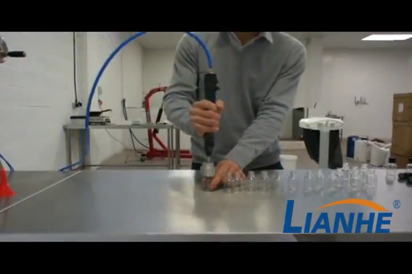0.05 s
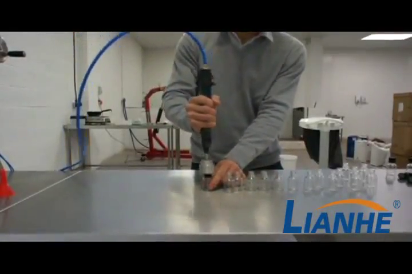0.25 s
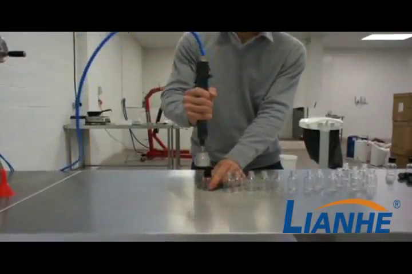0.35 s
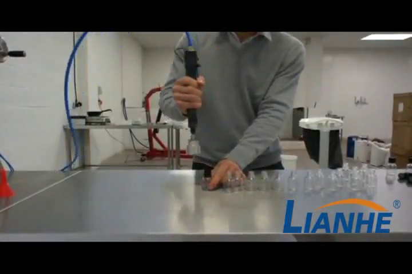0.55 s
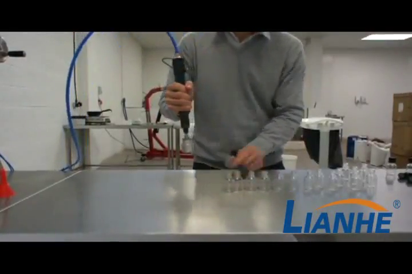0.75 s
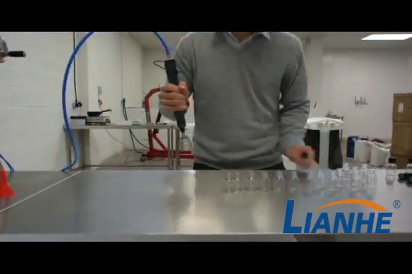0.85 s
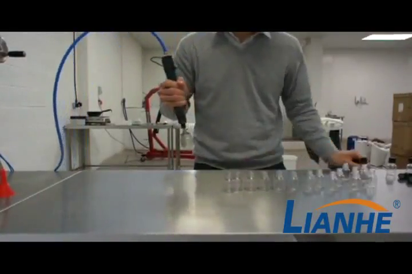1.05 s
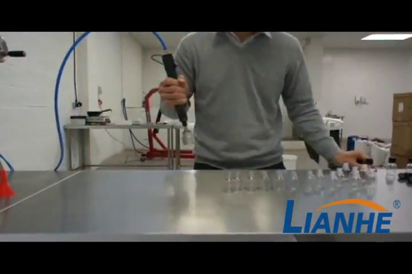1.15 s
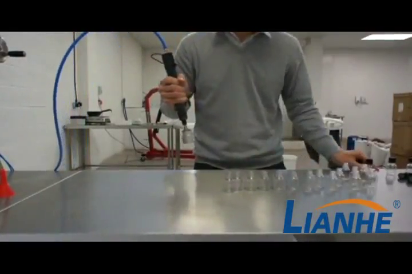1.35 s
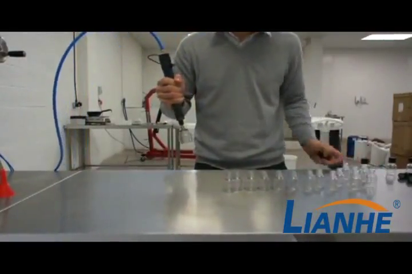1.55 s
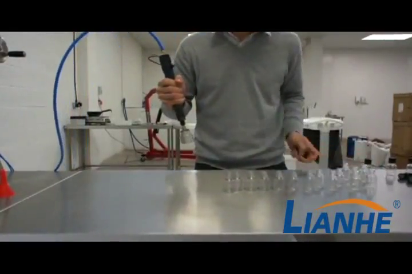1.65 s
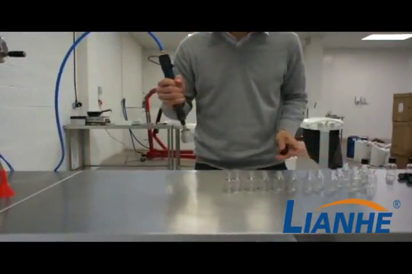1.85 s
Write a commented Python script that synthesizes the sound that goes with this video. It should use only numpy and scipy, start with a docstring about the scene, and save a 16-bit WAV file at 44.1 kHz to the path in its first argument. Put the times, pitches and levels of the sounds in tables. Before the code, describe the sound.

A handheld pneumatic capping tool gives one short burst of spitting air and shrill whine, clicks and pops off, rings through a hard workshop, then small glassy bottles knock lightly on a steel table.

```python
"""A large hard workshop: under a background murmur whose level rises, a handheld air motor screws a cap onto
a bottle. Spitting exhaust hiss and a valve thump open it, then comes a vane whine that sags under load, with a
clutch tick and a popping release. The hall rings on as filtered noise; then bottles, built from decaying
sine modes, knock on a steel table. A low hum swells near the end."""
import sys
import numpy as np
from scipy import signal
from scipy.fft import rfft, irfft
from scipy.io import wavfile
from scipy.ndimage import uniform_filter1d

SR = 44100
rng = np.random.default_rng(int(sys.argv[2]) if len(sys.argv) > 2 else 0)


def gain_from_db(level_db):
    """Convert decibel levels to linear amplitude factors (20 dB per decade)."""
    decades = np.asarray(level_db, float) / 20
    return 10 ** decades


def master_out(mix):
    """Clip the mix to full scale and print it as 16-bit PCM to the path in sys.argv[1]."""
    frames = np.transpose(np.atleast_2d(mix))
    ceiling = np.clip(frames, -1, 1)
    pcm = np.round(ceiling * 32767).astype(np.int16)
    wavfile.write(sys.argv[1], SR, pcm)


N = 83790
T = np.arange(N) / SR


def evened(x):
    """Scales a signal to an rms of one."""
    return x / np.sqrt(np.mean(x ** 2) + 1e-20)


def read(points, hz):
    """Reads a (Hz, value) table along a logarithmic frequency axis."""
    f, value = np.transpose(points)
    return np.interp(np.log(hz + 1), np.log(f + 1), value)


def curve(rows, axis):
    """A column in dB along time as gain, practically silent (-120 dB) outside."""
    rows = np.array(rows)
    return gain_from_db(np.interp(T, rows[:, 0], rows[:, axis], -120, -120))


def colour(x, points):
    """Shapes a spectrum by a (Hz, dB) table."""
    gain = gain_from_db(read(points, np.fft.rfftfreq(N, 1 / SR)))
    return irfft(rfft(x) * gain, N)


def slow(size):
    """Random wander of rms one: noise smoothed twice over size samples."""
    once = uniform_filter1d(rng.standard_normal(N), size)
    return evened(uniform_filter1d(once, size))


def add(mix, s, sound):
    """Lays a sound into the mix at s seconds, cut at the end."""
    part = mix[round(s * SR):][:len(sound)]
    part += sound[:len(part)]


def ring(modes, touch_s):
    """Struck solid: decaying sine modes of alternating sign; a longer touch softens the onset."""
    t = np.arange(6000) / SR
    onset = 1 - np.exp(-(t / touch_s) ** 2)
    body = sum((-1) ** k * gain_from_db(db - 60 * t / t60) * np.sin(2 * np.pi * hz * t)
               for k, (hz, db, t60) in enumerate(modes))
    return onset * body


def diffuse(gain):
    """Two partly alike noise channels with magnitude gain(Hz, s)."""
    # Each row: frequency in Hz, likeness of the two channels from -1 (opposite) to 1 (the same).
    likeness = [(60, 1), (150, 0.82), (500, 0.64), (1000, 0.44), (2000, 1), (3500, -0.74), (7000, -0.42),
                (13000, 0.35)]
    hz, t = np.fft.rfftfreq(512, 1 / SR)[:, None], np.arange(N // 128 + 5) * 128 / SR
    a, b, c, d = rng.standard_normal((len(t), len(hz), 4)).T
    same = np.clip(read(likeness, hz), -1, 1)
    left = a + 1j * b
    right = same * left + np.sqrt(1 - same ** 2) * (c + 1j * d)
    spectra = np.array([left, right]) * gain(hz, t)
    return signal.istft(spectra, nperseg=512, noverlap=384)[1][:, :N]


def workshop():
    """Background murmur as coloured stereo noise, its level rising, and a late, wavering low sine hum."""
    # Colour of the background noise. Each row: frequency in Hz, relative level in dB.
    floor_colour = [(25, -38), (60, 0), (144, 1), (267, 3.5), (363, 1.5), (674, 3.5), (800, -2.5),
                    (1190, -0.5), (1570, -4), (5000, -11.5), (11000, -20.5), (12500, -31), (14000, -39)]
    # Background noise level. Each row: time in seconds, level in dB.
    floor_level = [(0, -65.5), (.08, -59.5), (.2, -58.5), (1, -52.5), (1.9, -45.5)]
    # Swell of the hum. Each row: time in seconds, peak level in dB.
    hum_swell = [(1.65, -89), (1.75, -61), (1.85, -48), (1.9, -64)]
    noise = evened(diffuse(lambda hz, t: gain_from_db(read(floor_colour, hz)) + 0 * t))
    hum_hz = 178 * (1 + 0.0254 * slow(size=2000))
    hum = np.sin(2 * np.pi * np.cumsum(hum_hz) / SR)
    return noise * curve(floor_level, axis=1) + curve(hum_swell, axis=1) * hum


def air():
    """Turbulent exhaust as spitting hiss, and the dull rattle of the chuck on the cap; both are shaped noise."""
    # Each row: time in seconds, hiss level in dB, chuck rattle level in dB.
    air_levels = [(.205, -53, -81), (.21, -60, -54), (.219, -26.5, -40.5), (.255, -23, -29.5),
                  (.287, -25, -32), (.301, -19.5, -23.5), (.327, -32.5, -26.5), (.4, -23.5, -37),
                  (.465, -24.5, -36), (.499, -28, -28.5), (.53, -44, -33.5)]
    # Colour of the exhaust. Each row: frequency in Hz, relative level in dB.
    hiss_colour = [(1500, -13), (2500, -6.5), (4500, -8.5), (6500, -3), (7500, -5.5), (10000, -1),
                   (11500, -4.5), (12800, -17), (13600, -56), (15500, -33)]
    # Colour of the chuck on the cap. Each row: frequency in Hz, relative level in dB.
    rattle_colour = [(53, -68), (90, -11), (216, -5), (357, -3.5), (395, -7), (761, -2), (1120, 0.5),
                     (3230, -10.5), (5000, -12.5), (6500, -80), (11000, -120)]
    spits_db = 2  # rms level flutter
    hiss = evened(colour(rng.standard_normal(N), hiss_colour))
    hiss = hiss * gain_from_db(spits_db * slow(size=40))
    rattle = evened(colour(rng.standard_normal(N), rattle_colour))
    rattle = rattle * gain_from_db(spits_db * slow(size=100))
    return curve(air_levels, axis=1) * hiss + curve(air_levels, axis=2) * rattle


def valve():
    """Puffs as the valve opens and the air is dumped are short sine glides; metal ticks in the tool ring."""
    # Each row: start in seconds, peak level in dB, start pitch in Hz, end pitch in Hz, length in seconds.
    puffs = [(0.221, -22, 470, 390, 0.0079), (0.231, -24, 400, 354, 0.016), (.482, -29, 1665, 878, 0.0147),
             (.486, -18, 672, 488, 0.011), (0.503, -17, 598, 436, 0.0066), (0.511, -27.5, 540, 700, 0.0078),
             (0.541, -21.5, 683, 756, 0.0066)]
    # Metal ticks. Each row: start in seconds, level in dB (halved in amplitude below).
    ticks = [(0.2107, -37.5), (0.2829, -5), (0.296, -14), (0.313, -37)]
    # Modes of the ticking metal. Each row: frequency in Hz, relative level in dB, t60 in seconds.
    tick_modes = [(10920, 13, 0.0044), (6540, 5, .004), (3700, 5.5, .004), (9200, -16, .004),
                  (12260, -18, 0.002), (14600, -28, 0.0028)]
    out = np.zeros(N)
    for s, db, hz, end_hz, length in puffs:
        t = np.arange(0, length, 1 / SR)
        swell = np.sin(np.pi * t / length) ** 2
        glide = np.sin(np.pi * t * (2 * hz + (end_hz - hz) * t / length))
        add(out, s, gain_from_db(db) * swell * glide)
    for s, db in ticks:
        add(out, s, gain_from_db(db) * ring(tick_modes, touch_s=0.00018) / 2)
    return out


def whine():
    """Harmonics of the vane rate, loud where they cross the exhaust port's resonances."""
    # Each row: time in seconds, vane rate in Hz, whine level in dB.
    motor = [(.226, 1016, -33), (.236, 1073, -24), (.246, 1118, -19.5), (.258, 1144, -26), (.28, 1104, -19),
             (.308, 1074, -22), (.328, 1030, -19.5), (.345, 988, -30), (.364, 976.5, -20.5),
             (.408, 965, -33), (.44, 963, -21), (.468, 984.5, -19), (.49, 985, -29)]
    # Exhaust port colour for the vane harmonics. Each row: frequency in Hz, gain in dB.
    port = [(900, -30), (1090, -19), (1900, -30), (2900, -18), (3400, -28), (4850, -17), (5300, -10),
            (5650, -6), (5900, -11), (6300, -9), (6750, -3), (7200, -11), (7700, -27), (9000, -27),
            (9900, -14), (10700, -19), (12500, -32)]
    wobble, flutter_db = .0012, 1.3  # rms pitch wander as a fraction, rms level wander of each harmonic
    spin_s, stop_s = .006, .014
    rows = np.array(motor)
    hz = np.interp(T, rows[:, 0], rows[:, 1]) * (1 + wobble * slow(size=60))
    turns = np.cumsum(hz) / SR
    tone = np.zeros(N)
    for k in range(1, 12):
        level = gain_from_db(read(port, k * hz) + flutter_db * slow(size=150))
        tone += level * np.cos(2 * np.pi * (k * turns + rng.random()))
    spin_up = np.clip((T - rows[0, 0]) / spin_s, 0, 1)
    stop = np.clip((rows[-1, 0] - T) / stop_s, 0, 1)
    return np.sqrt(2) * spin_up * stop * curve(motor, axis=2) * tone


def hall(x, near_db):
    """Room response: direct sound, two clear echoes, dense scatter off benches and near walls, a long tail."""
    # Hall decay. Each row: frequency in Hz, t60 in seconds.
    decay = [(100, 1.64), (260, 1.05), (700, 1.17), (1840, 1.74), (4850, 1.7), (8000, 1.124), (12800, 0.6)]
    # Clear echoes. Each row: delay in seconds, left level in dB, right level in dB.
    echoes = [(.0105, -8, -10), (.0235, -13, -12)]
    hall_db, gap_s, build_s = -8, 0.016, 0.013
    near_t60_s, near_build_s = 0.25, 0.0088
    tail = diffuse(lambda hz, t: gain_from_db(-60 * t / read(decay, hz)))
    tail = tail * np.clip((T - gap_s) / build_s, 0, 1)
    near = diffuse(lambda hz, t: 1 + 0 * hz * t)
    near = near * gain_from_db(-60 * T / near_t60_s) * np.clip(T / near_build_s, 0, 1)
    # Levels are energies of the left channel against the direct sound.
    taps = gain_from_db(hall_db) * tail / np.linalg.norm(tail[0]) + gain_from_db(near_db) * near / np.linalg.norm(near[0])
    taps[:, 0] += 1  # direct sound
    for s, left_db, right_db in echoes:
        taps[:, round(s * SR)] += gain_from_db(np.array([left_db, right_db]))
    return signal.fftconvolve(x[None], taps, axes=1)[:, :N]


def knock(glass_db, hz, table_db, settle_s):
    """A bottle lands, chatters against its neighbours and shakes the steel top as it settles."""
    # Glass modes. Each row: ratio to the bottle's pitch, relative level in dB, t60 in seconds.
    glass_modes = [(.88, 1, .005), (1, 5, .006), (1.12, 3, .005), (1.25, -3, .005), (1.55, -14, .004),
                   (1.85, -9, .004), (2.05, -5, .005), (2.25, -7, .004), (2.5, -10, .004),
                   (2.75, -12, .004)]
    # Sheet steel top. Each row: frequency in Hz, relative level in dB, t60 in seconds.
    steel_modes = [(400, -12.5, 0.038), (533, -0.5, 0.059), (620, -6, 0.044), (718, -1, 0.035),
                   (817, -3.5, 0.036), (915, -3, 0.033), (1020, -1, .025), (1202, 1, 0.029),
                   (1374, 1, 0.014), (1460, -4, 0.04), (1642, 0.5, 0.021), (1876, -2.5, 0.025),
                   (2090, -6.5, 0.019), (2370, -5, .015)]
    chatter_db, chatter_per_s, thud_db = -15.5, 1200, -4.5
    touch_s, table_lag_s = .0004, 0.002197
    t = np.arange(8000) / SR
    settling = np.exp(-t / settle_s)
    size, chance = rng.standard_normal(len(t)), rng.random(len(t))
    chatter = gain_from_db(chatter_db) * size * (chance < chatter_per_s / SR) * settling
    chatter[0] = 1  # the landing itself
    shake = rng.standard_normal(len(t)) * settling
    shake = shake / np.linalg.norm(shake)
    shake[0] = gain_from_db(thud_db)
    bottle = [(hz * ratio, db, t60) for ratio, db, t60 in glass_modes]
    glass = signal.fftconvolve(chatter, ring(bottle, touch_s))
    table = signal.fftconvolve(shake, ring(steel_modes, touch_s))
    return gain_from_db(glass_db) * glass + gain_from_db(table_db) * np.roll(table, round(table_lag_s * SR))


def bottles():
    """Bottles set down one after another, each striking glass and steel modes."""
    # Each row: start in seconds, glass level in dB, glass pitch in Hz, table level in dB,
    # settling time constant in seconds.
    knocks = [(1.3546, -28.5, 3970, -30, 0.031), (1.6043, -28, 3720, -30.5, 0.052),
              (1.8703, -33, 3630, -51, 0.012)]
    out = np.zeros(N)
    for s, *row in knocks:
        add(out, s, knock(*row))
    return out


def scene():
    """Tool and bottles each sound in the hall, over the workshop's murmur."""
    tool = whine() + air() + valve()
    return workshop() + hall(tool, near_db=-6) + hall(bottles(), near_db=-0.5)


def roll_off(x):
    """The treble ends steeply here."""
    return signal.sosfilt(signal.butter(12, 15920, fs=SR, output="sos"), x)


def record(dry):
    """Two microphone ports, the left fuller in the bass and mostly late; gain control squeezes the loud tool."""
    # Each row: frequency in Hz, left level over right in dB.
    left_over_right = [(60, 2), (1000, 2), (3000, .5), (13000, 1)]
    # Each row: frequency in Hz, phase lead of left over right in radians (negative is late).
    left_lead = [(100, -1.25), (500, 0.54), (1000, -0.57), (2000, -1.36), (3500, -0.51), (6000, -1.06),
                 (9000, -0.18), (13000, -0.29)]
    mic_cut_hz = 127
    knee_db, squeeze, fall_db_per_s = -34, .48, 188  # squeeze: dB taken off per dB over the knee
    hz = np.fft.rfftfreq(N, 1 / SR)
    # Each port takes half of the level and phase difference.
    half = gain_from_db(read(left_over_right, hz) / 2) * np.exp(.5j * read(left_lead, hz))
    low_cut = 1 / np.sqrt(1 + (mic_cut_hz / (hz + 1)) ** 4)
    ports = irfft(rfft(dry) * low_cut * np.array([half, 1 / half]), N)
    # The level follower looks mostly back, holds peaks and lets them fall steadily.
    power = uniform_filter1d((ports ** 2).mean(0), size=200, origin=90)
    power_db = 10 * np.log10(abs(power) + 1e-12)
    fall = T * fall_db_per_s
    held_db = np.maximum.accumulate(power_db + fall) - fall
    over_db = np.maximum(held_db - knee_db, 0)
    mix = ports / gain_from_db(squeeze * uniform_filter1d(over_db, size=60))
    return roll_off(mix)


dry = scene()
out = record(dry)
master_out(out)
```